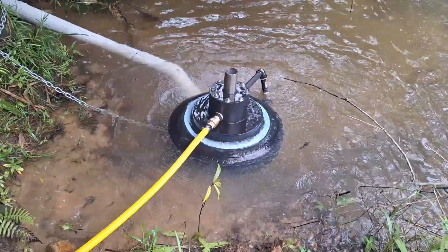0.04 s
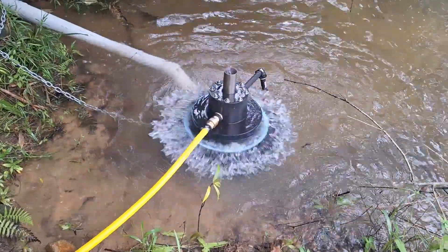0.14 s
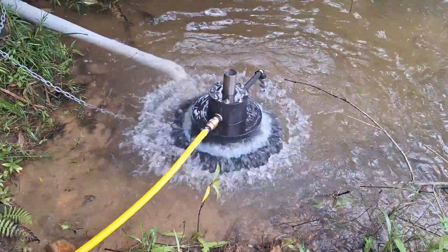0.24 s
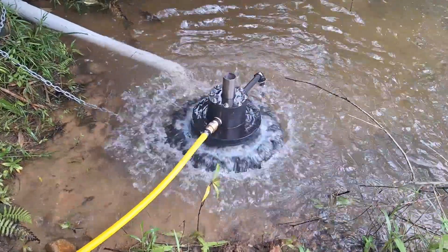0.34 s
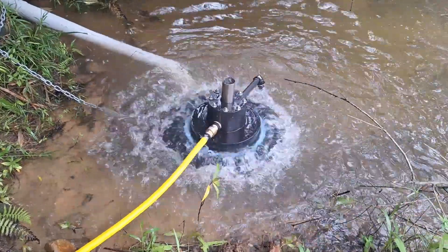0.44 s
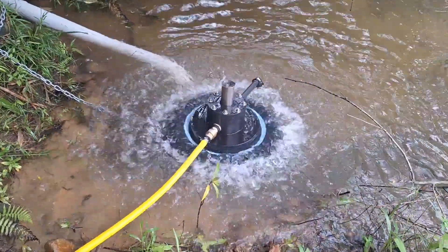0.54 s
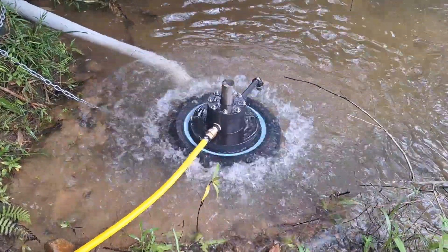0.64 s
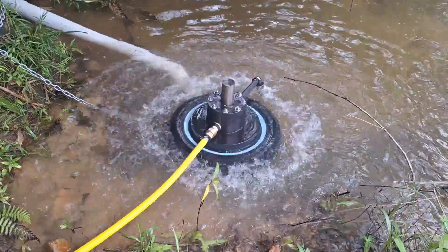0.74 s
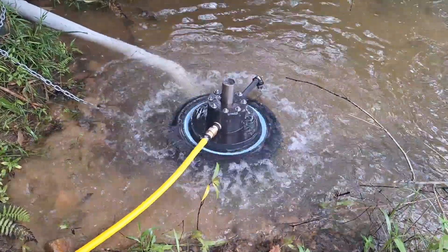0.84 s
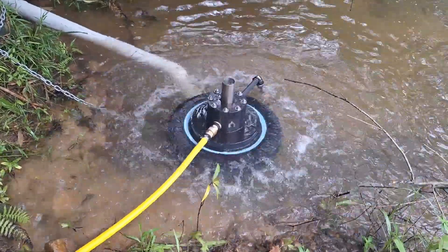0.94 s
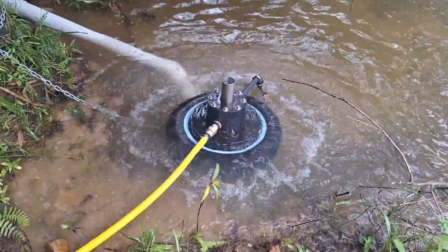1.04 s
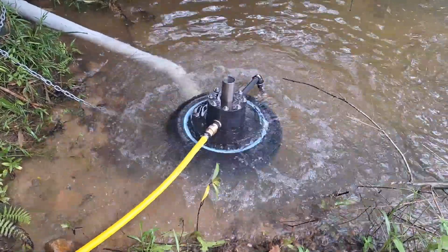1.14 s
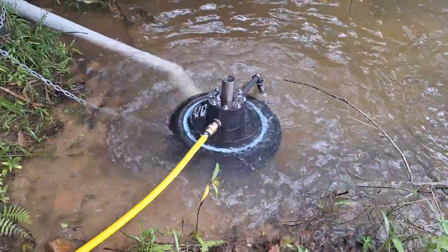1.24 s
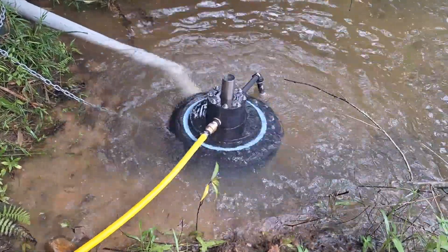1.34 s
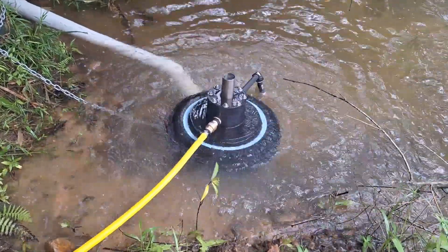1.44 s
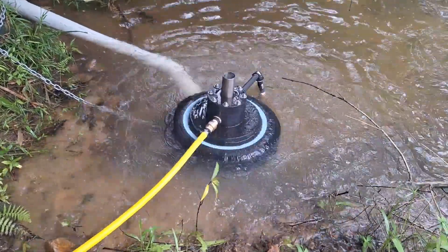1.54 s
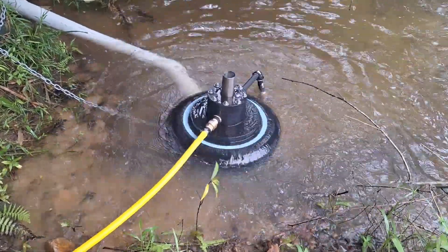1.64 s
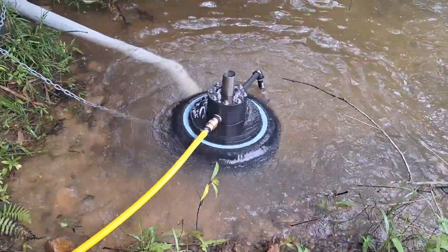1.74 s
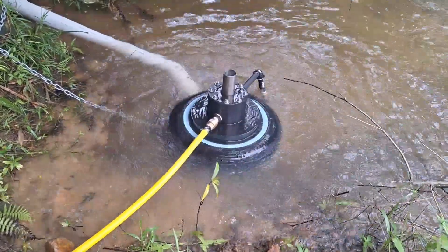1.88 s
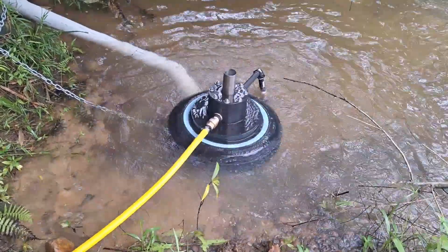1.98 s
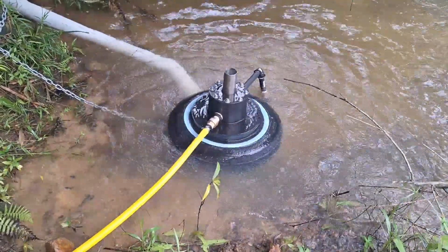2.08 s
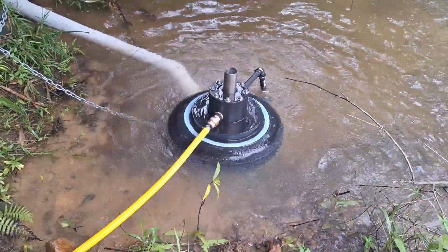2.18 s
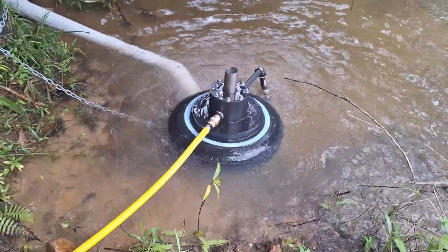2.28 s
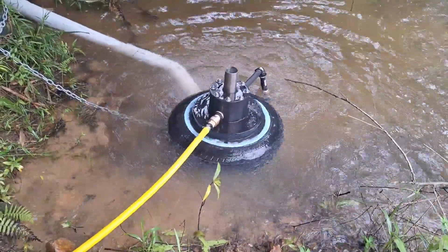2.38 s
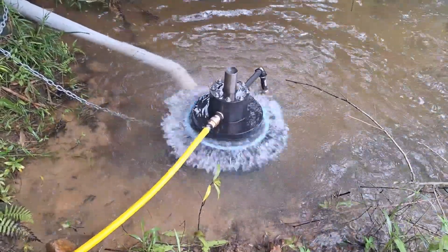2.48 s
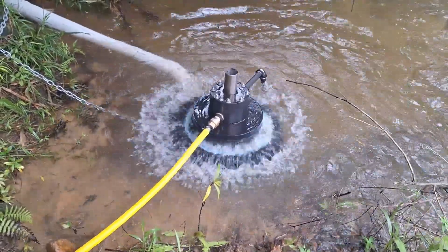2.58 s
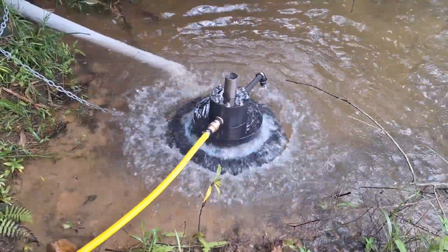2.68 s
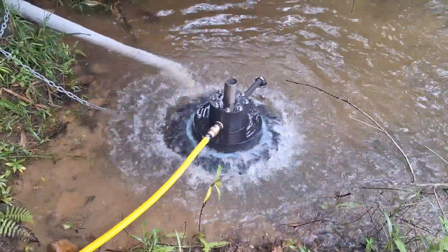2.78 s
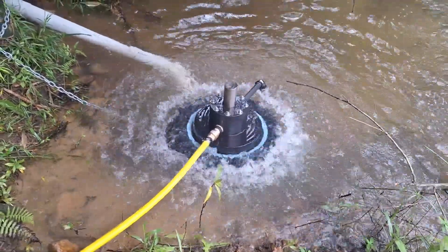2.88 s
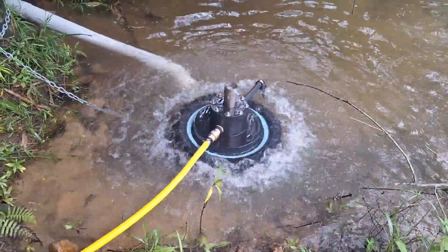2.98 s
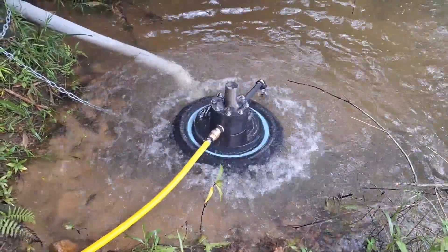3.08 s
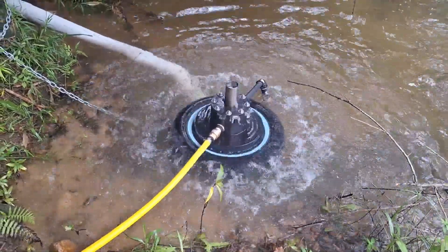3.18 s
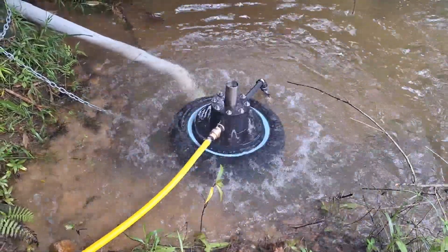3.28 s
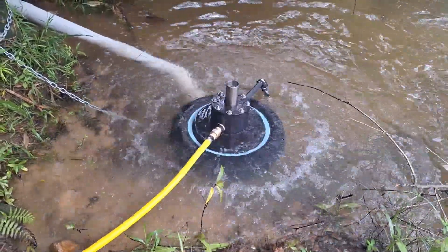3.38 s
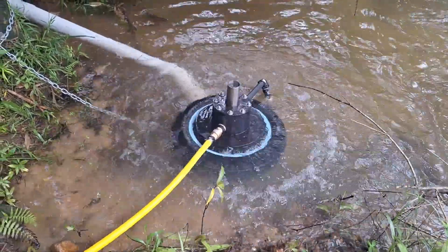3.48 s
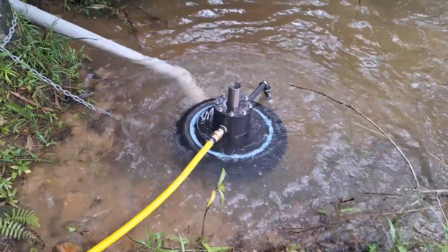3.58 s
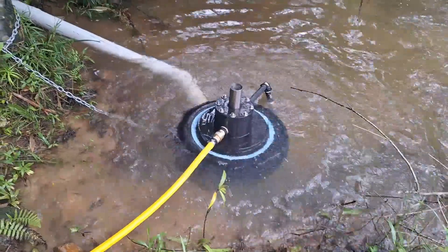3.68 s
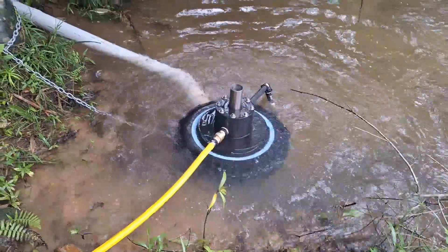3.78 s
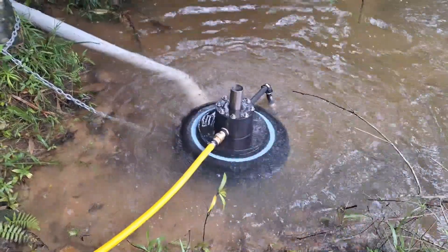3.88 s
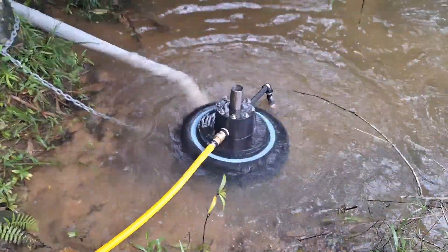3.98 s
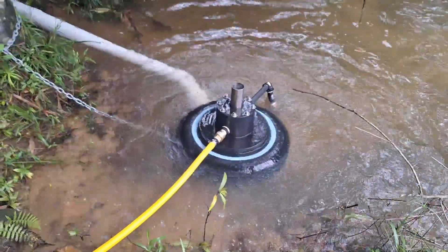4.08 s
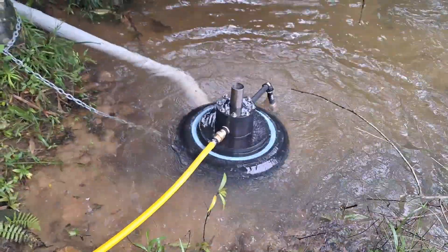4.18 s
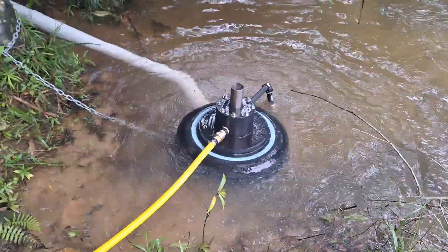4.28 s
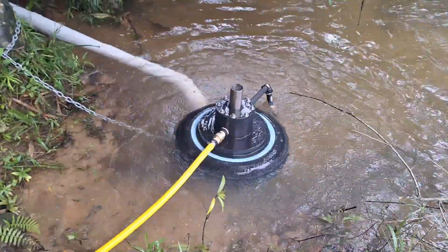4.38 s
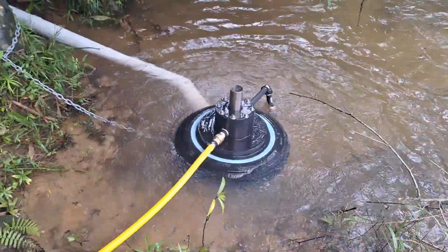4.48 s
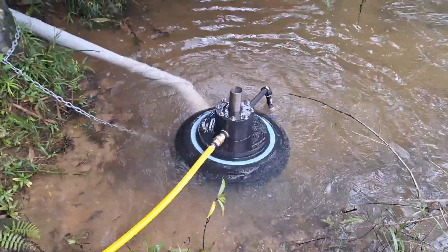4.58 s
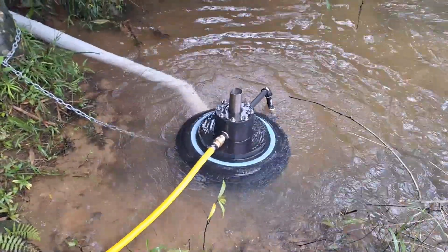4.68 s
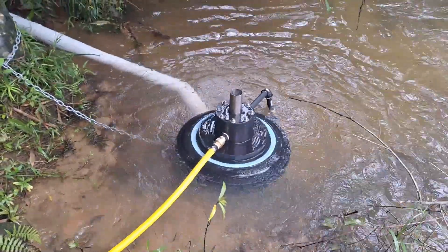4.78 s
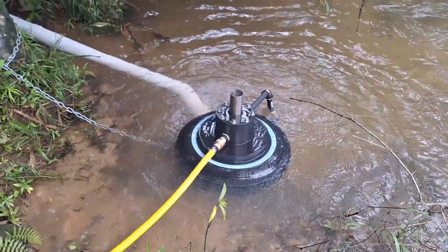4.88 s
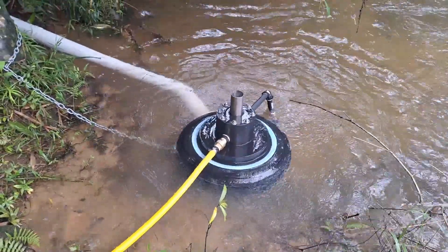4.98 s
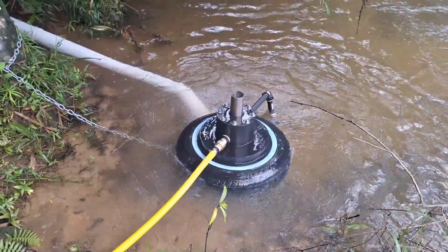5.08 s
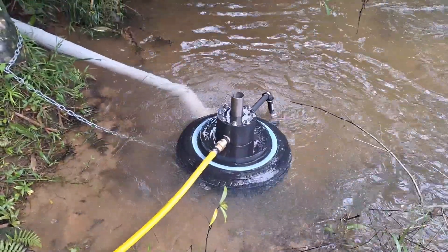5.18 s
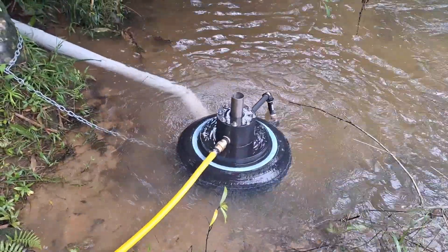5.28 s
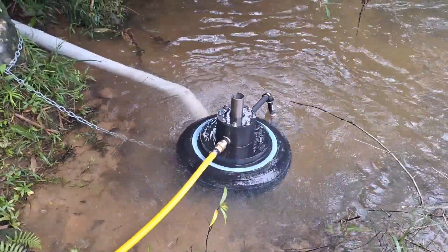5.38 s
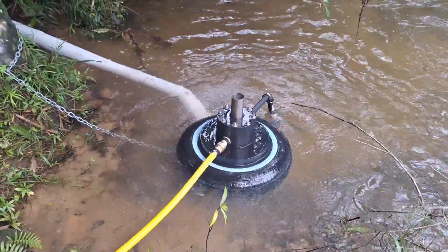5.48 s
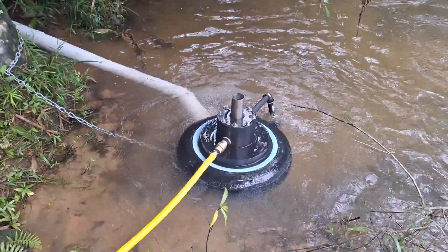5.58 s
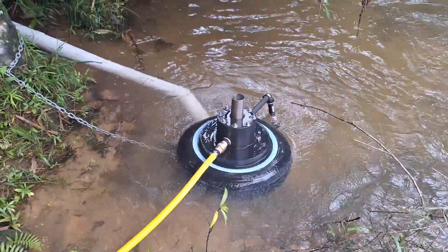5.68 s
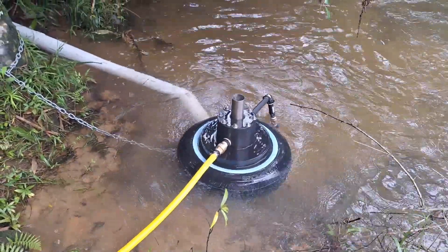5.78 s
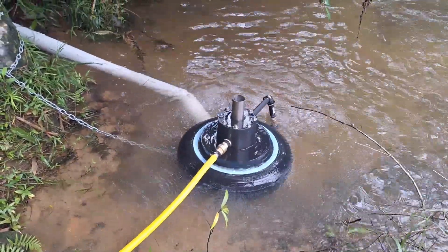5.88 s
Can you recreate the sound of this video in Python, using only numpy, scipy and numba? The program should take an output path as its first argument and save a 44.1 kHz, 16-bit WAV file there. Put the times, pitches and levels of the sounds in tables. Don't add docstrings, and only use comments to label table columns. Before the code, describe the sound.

A small fall pours and sprays without pause while a pump twice throws out a sudden gulping splash, at the start and midway.

```python
import sys
import numpy as np
from scipy import signal
from scipy.fft import rfft, irfft, next_fast_len
from scipy.io import wavfile
from scipy.ndimage import uniform_filter1d, map_coordinates
from numba import njit

SR = 44100
rng = np.random.default_rng(int(sys.argv[2]) if len(sys.argv) > 2 else 0)


def gain_from_decibels(decibels):
    exponent = np.asarray(decibels, float) / 20
    return 10 ** exponent


def generate_wav(signal):
    frames = np.transpose(np.atleast_2d(signal))
    scaled = np.clip(frames, -1, 1) * 32767
    pcm = np.round(scaled).astype(np.int16)
    wavfile.write(sys.argv[1], SR, pcm)


N = 261832

# burst_s, spurt_lead_s, burst_longer_s, backwash_longer_s, wash_db
VALVE_STROKES = [
    (0.157, 0.098, 0.01, .001, 0.35),
    (2.514, 0.098, 0.001, 0.021, -0.12),
]
# start_s, rise_s, hold_s, fall_db_per_s
SPURT = (0, .03, .015, 200)
SLAP = (0, .005, .012, 500)
BURST = (0.013, 0.022, .015, 111)
WASH = (.11, .05, 0.034, 49)
BACKWASH = (0.23, 0.042, .14, 73)


def discharge(t, stage_db, late_s, quick):
    power = 1e-12
    stages = (SPURT, SLAP, BURST, WASH, BACKWASH)
    for burst_s, lead_s, burst_longer_s, backwash_longer_s, wash_db in VALVE_STROKES:
        shifts_s = (-lead_s, late_s, late_s, late_s, late_s)
        longer_s = (0, 0, burst_longer_s, 0, backwash_longer_s)
        levels_db = np.add(stage_db, (0, 0, 0, wash_db, wash_db))
        for (start, rise, hold, fall), shift, longer, db in zip(stages, shifts_s, longer_s, levels_db):
            age = t - burst_s - start - shift
            fallen_db = quick * fall * np.clip(age - rise - hold - longer, 0, None)
            power = power + (gain_from_decibels(db - fallen_db) * np.clip(age / rise, 0, 1)) ** 2
    return 10 * np.log10(power)


# (spurt_db, slap_db, burst_db, wash_db, backwash_db), late_s, fall_factor
SLOSH_STAGES = (-58, -20, -23.5, -38, -32.5), 0.013, 2.8
FROTH_STAGES = (-23.5, -17.5, -21, -25.5, -31), 0.00082, 0.81
SPATTER_STAGES = (-33.5, -29.5, -28, -39.5, -41.5), 0.011, 1
MIST_STAGES = (-50, -28, -36, -39.5, -44.5), .002, 0.4
# peak_s, swell_db
SLOPS = [
    (0.349, 1.5),
    (.425, 0.5),
    (.5, 0.5),
    (.575, -1.5),
    (2.705, 1),
    (2.845, 2),
    (2.93, 0.5),
    (3.04, 2.5),
]
# frequency_hz, left_db_per_hz, right_db_per_hz
FROTH_COLOUR = [(80, -29, -33), (250, -9.5, -8), (440, -11.5, -12.5), (1010, -2, -1), (1300, -2.5, -5.5),
                (1800, 1.7, 0), (2570, -2.5, -13.5), (3100, -8.5, -13.5), (4420, -9, -9),
                (5660, -10.5, -21), (7830, -8, -19), (8950, -18, -23.5), (13100, -25.5, -15),
                (15600, -15, -19)]
# frequency_hz, likeness_0_to_1
PUMP_ALIKE = [(100, 0.93), (500, 1), (1200, 1), (2500, 0.1), (6000, 0.074)]
PUMP_LAG_S = -0.00015
SLOP_HALF_WIDTH_S, SLOP_SPRAYS = 0.012, 1.55


def gush():
    t = np.arange(N) / SR
    slosh_db = discharge(t, *SLOSH_STAGES) - 7.0
    froth_db = discharge(t, *FROTH_STAGES) - 3.0
    spatter_db = discharge(t, *SPATTER_STAGES) + 3.5
    mist_db = discharge(t, *MIST_STAGES) - 0.5
    lumps = 0.63 * wobble(150) + 0.23 * wobble(29.3)
    slops = sum(db * np.exp(-((t - s) / SLOP_HALF_WIDTH_S) ** 2) for s, db in SLOPS)
    fine_db = SLOP_SPRAYS * slops + lumps
    stream = water(bubbles(count=50000, cycles=4, scatter_db=9), share=0.44, patchy_db=0.0)
    heard_at = (stream, FROTH_COLOUR, PUMP_ALIKE, PUMP_LAG_S)
    slosh = gain_from_decibels(slosh_db) * ports(*heard_at, low_hz=55, high_hz=470)
    froth = gain_from_decibels(froth_db + slops + lumps) * ports(*heard_at, low_hz=450, high_hz=3280)
    spatter = gain_from_decibels(spatter_db + fine_db) * ports(*heard_at, low_hz=3180, high_hz=9100)
    mist = gain_from_decibels(mist_db + fine_db) * ports(*heard_at, low_hz=9200, high_hz=30000)
    return slosh + froth + spatter + mist


# start_s, level_db, pitch_hz
DROPS = [(.0924, -18, 1860), (.1625, -7, 2020), (.168, -13, 2250), (.1754, -5, 2000), (.1834, -14, 1810),
         (.2104, -18, 1850), (.222, -7, 1630), (.2284, -19, 1920), (.4199, -14, 1280), (.4826, -15, 1540),
         (.5696, -15, 1760), (.3247, -24, 1740), (.3537, -22, 1020), (2.4544, -17, 2200),
         (2.7124, -19, 1940), (2.5242, -17, 1300), (2.5284, -5, 2370), (2.5524, -3, 2700),
         (2.5604, -9, 1820), (2.7, -18, 1800), (2.769, -14, 1680), (2.7914, -15, 1550), (2.8547, -17, 1540),
         (2.874, -18, 1380)]
# start_s, level_db, pitch_hz
GULPS = [(.17, -14, 526), (.205, -18, 292), (.285, -20, 181), (.345, -22, 626), (.428, -20, 282),
         (.45, -21.5, 227), (.489, -23, 218), (.543, -26, 250), (.57, -27, 268), (0.607, -24.5, 110),
         (.917, -30, 77), (2.524, -11, 970), (2.541, -18.5, 259), (2.552, -20, 426), (2.597, -16.5, 223),
         (2.624, -26.5, 74), (2.64, -19, 190), (2.84, -21, 530), (2.85, -25, 210), (2.955, -28, 90),
         (3.02, -18.5, 794), (2.19, -29, 121), (4.339, -31, 280), (4.69, -27, 69), (4.82, -31, 287),
         (5.199, -30.5, 250), (5.871, -27, 86), (5.907, -21.5, 285)]
# start_s, level_db, pitch_hz
BLOOPS = [
    (.2, -24.5, 81),
    (.245, -21.5, 235),
    (.5, -27, 670),
    (2.973, -20.5, 580),
    (2.992, -25, 990),
]
DROP_CYCLES, GULP_CYCLES, BLOOP_CYCLES = 4.5, 4.6, 9.7
DROP_LEFT_DB, GULP_LEFT_DB = 3.2, 1.6
DROP_LAG_S = -0.00012
PATTER_OVER_FROTH_DB, PATTER_HZ, PATTER_LOG_SPREAD = 2.5, 1650, .2


def single_bubbles():
    when, size_db, pitch = rng.random(120) * N / SR, rng.normal(0, 3, 120), rng.standard_normal(120)
    patter_db = discharge(when, *FROTH_STAGES) + PATTER_OVER_FROTH_DB + size_db
    patter = np.transpose([when, patter_db, PATTER_HZ * np.exp(PATTER_LOG_SPREAD * pitch)])
    s, db, hz = np.transpose(np.concatenate([DROPS, patter]))
    drops = ring(np.zeros(N), s, hz, np.full(len(s), DROP_CYCLES), gain_from_decibels(db + 3.5), 0.017, SR)
    s, db, hz = np.transpose(np.concatenate([GULPS, BLOOPS]))
    cycles = np.repeat([GULP_CYCLES, BLOOP_CYCLES], [len(GULPS), len(BLOOPS)])
    gulps = ring(np.zeros(N), s, hz, cycles, gain_from_decibels(db + 1.5), 0.02, SR)
    halves = np.array([[0.5], [-0.5]])
    both = drops * gain_from_decibels(DROP_LEFT_DB * halves) + gulps * gain_from_decibels(GULP_LEFT_DB * halves)
    return filtered(both, lambda hz: lag_phase(hz, DROP_LAG_S))


# time_s, flow_over_fall_db, spray_carried_by_air_db
FLOW = [(0, 1, 1.5), (.9, 0, -0.5), (1.45, -0.5, 0), (2, 2, 1), (2.4, 1.5, 2), (3.3, -0.5, -0.5),
        (3.75, 0, 0), (4.25, 0.5, 3.5), (4.7, 1.5, 3.5), (5.3, 1, 4), (5.8, 1.5, 3), (5.94, 4, 3.5)]
# frequency_hz, left_db_per_hz, right_db_per_hz
POUR_COLOUR = [(42.6, -9.5, -4), (74, -2, -3.5), (250, -2.5, -3.5), (467, -4.5, -5), (910, -2, -2.5),
               (1300, -6.5, -7.5), (1790, -3.5, -6.5), (2350, -5.5, -8), (3270, -9, -23.5),
               (4670, -12, -2.5)]
# frequency_hz, left_db_per_hz, right_db_per_hz
SPRAY_COLOUR = [(2600, -18, -6), (3300, -12.5, -7.5), (4560, -6.5, -15.5), (6100, -9.5, -16.5),
                (6880, -4, -15), (7110, -5.5, -4), (7930, 2, -3), (8450, -7, -6.5), (8870, -16.5, -12.5),
                (9460, -16.5, -19.5), (11000, -18.5, -12), (13000, -23, -11), (14500, -19, -14),
                (15700, -27.8, -9)]
# frequency_hz, likeness_0_to_1
CREEK_ALIKE = [(50, .99), (130, .985), (300, .95), (600, .82), (1200, .82), (2300, .55), (4500, .33),
               (8000, .1), (13000, .15)]
CREEK_LAG_S = 0.000418
POUR_DB, SPRAY_DB, THUD_DB, MIST_DB = -33, -34.5, -45.5, -49.5
THUD_GROWS, SPRAY_GROWS, MIST_FLIES = 2.4, 0.24, 2.15


def creek():
    flow_db, carried_db = curves(FLOW)
    surge = .35 * wobble(6) + .3 * wobble(14)
    thud_db = THUD_DB + THUD_GROWS * flow_db + 1.3 * wobble(6.8) + 0.37 * wobble(2.88)
    pour_db = POUR_DB + flow_db + surge
    spray_db = SPRAY_DB + SPRAY_GROWS * flow_db + carried_db + surge
    mist_db = MIST_DB + MIST_FLIES * carried_db + surge
    rumble = rng.standard_normal((2, N))
    body = water(bubbles(count=30000, cycles=5.6, scatter_db=6.0), share=0.25, patchy_db=1.0)
    fizz = water(bubbles(count=40000, cycles=3.7, scatter_db=18.5), share=0.24, patchy_db=1.0)
    place = (CREEK_ALIKE, CREEK_LAG_S)
    thud = gain_from_decibels(thud_db) * ports(rumble, POUR_COLOUR, *place, low_hz=52, high_hz=99)
    pour = gain_from_decibels(pour_db) * ports(body, POUR_COLOUR, *place, low_hz=130, high_hz=3060)
    spray = gain_from_decibels(spray_db) * ports(fizz, SPRAY_COLOUR, *place, low_hz=3120, high_hz=9500)
    mist = gain_from_decibels(mist_db) * ports(fizz, SPRAY_COLOUR, *place, low_hz=9250, high_hz=30400)
    return thud + pour + spray + mist


def water(grains, share, patchy_db):
    z = signal.stft(rng.standard_normal((2, N)), nperseg=512)[2]
    field = uniform_filter1d(rng.standard_normal(z.shape[1:]), size=6, axis=0)
    field = uniform_filter1d(field, size=10, axis=1)
    hiss = unit(signal.istft(z * gain_from_decibels(patchy_db * unit(field)), nperseg=512)[1][:, :N])
    share = np.clip(share, 0, 1)
    return np.sqrt(1 - share) * hiss + np.sqrt(share) * grains


def bubbles(count, cycles, scatter_db):
    swarm = []
    for draw in rng.random((2, count, 4)):
        start_s = draw[:, 0] * N / SR
        hz = 150 + draw[:, 1] * 16500
        gain = np.sqrt(hz) * gain_from_decibels(np.clip(scatter_db, 0, 16) * draw[:, 2] ** 2)
        decay_cycles = cycles * (.5 + draw[:, 3])
        swarm.append(unit(ring(np.zeros(N), start_s, hz, decay_cycles, gain, 0.099, SR)))
    return np.array(swarm)


@njit
def ring(out, s, hz, cycles, gain, rise, sr):
    for k in range(len(s)):
        first = int(s[k] * sr)
        for i in range(min(int(2 * cycles[k] * sr / hz[k]), len(out) - first)):
            turn = i * hz[k] / sr
            age = turn / cycles[k]
            envelope = gain[k] * (1 - np.exp(-2 * turn)) * np.exp(-2.5 * age)
            out[first + i] += envelope * np.sin(2 * np.pi * turn * (1 + rise * age))
    return out


def ports(pair, colour, alike, lag_s, low_hz, high_hz):
    def turn(hz):
        return np.arccos(np.clip(along(alike, hz)[0], 0, 1)) / 2

    def path(hz):
        return gain_from_decibels(along(colour, hz)) * band(hz, low_hz, high_hz) * lag_phase(hz, lag_s)

    mid, side = filtered(pair, lambda hz: np.array([np.cos(turn(hz)), np.sin(turn(hz))]))
    return unit(filtered([mid + side, mid - side], path))


def lag_phase(hz, lag_s):
    return np.exp(-1j * np.pi * hz * lag_s * np.array([[1], [-1]]))


def band(hz, low_hz, high_hz):
    return np.sqrt(hz ** 6 / (hz ** 6 + low_hz ** 6) / (1 + (hz / high_hz) ** 6))


def filtered(x, response):
    m = next_fast_len(N + 8192)
    return irfft(rfft(x, m) * response(np.fft.rfftfreq(m, 1 / SR)), m)[..., :N]


def wobble(rate):
    knots = rng.standard_normal(int(N * rate / SR) + 4)
    return map_coordinates(knots, [np.arange(N) * rate / SR])


def curves(rows):
    s, *cols = np.transpose(rows)
    return [np.interp(np.arange(N) / SR, s, c) for c in cols]


def along(points, hz):
    f, *cols = np.transpose(points)
    return np.array([np.interp(np.log(hz + 1), np.log(f + 1), c) for c in cols])


def unit(x):
    return x / np.sqrt(np.mean(x ** 2) + 1e-20)


def scene():
    return gush() + single_bubbles() + creek()


def band_limit(x):
    return signal.sosfilt(signal.butter(12, 17030, fs=SR, output="sos"), x)


def record(dry):
    noise = rng.standard_normal((2, N))
    hiss = gain_from_decibels(-62) * filtered(noise, lambda hz: band(hz, low_hz=12000, high_hz=1e6))
    corner_hz = np.array([[12], [45]])
    top_hz = 15900

    def response(hz):
        roll_off = 1j * hz / (corner_hz + 1j * hz)
        return roll_off * band(hz, low_hz=45.6, high_hz=1e6) * (hz < top_hz)

    mix = filtered(dry + hiss, response)
    return band_limit(mix)


dry = scene()
out = record(dry)
generate_wav(out)
```